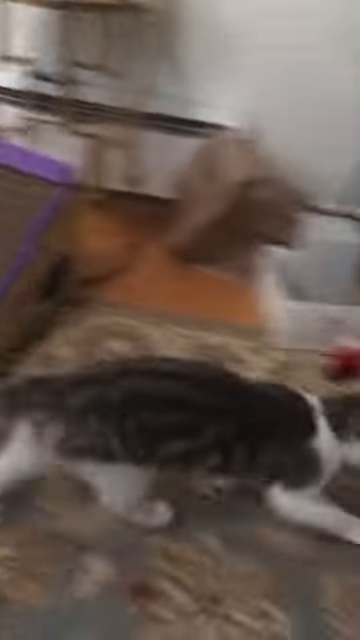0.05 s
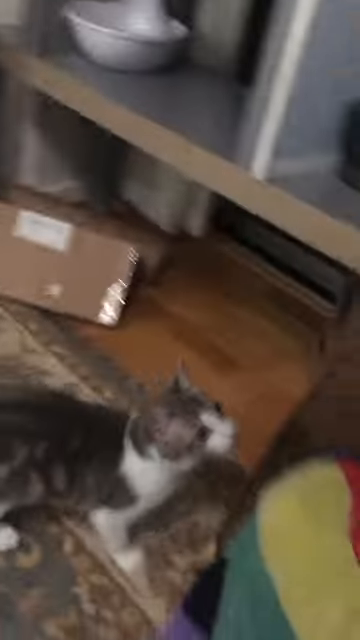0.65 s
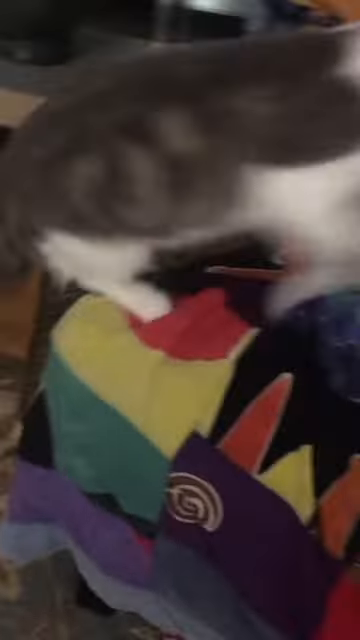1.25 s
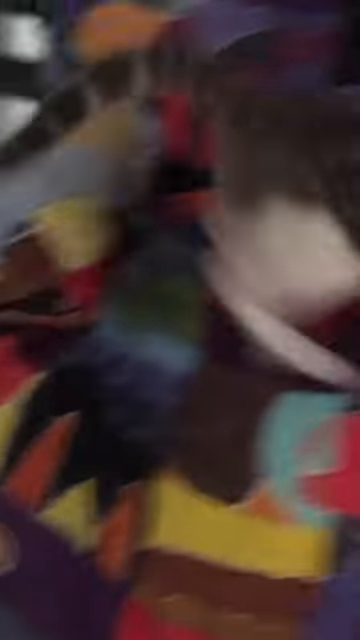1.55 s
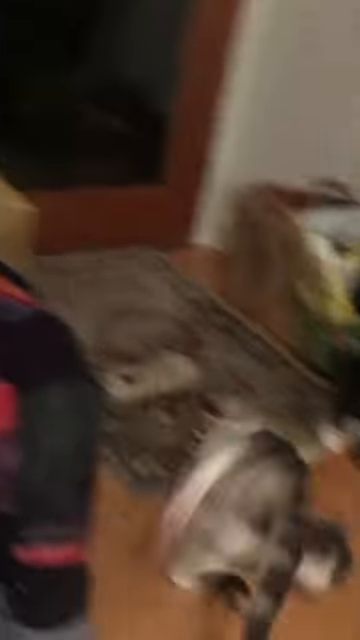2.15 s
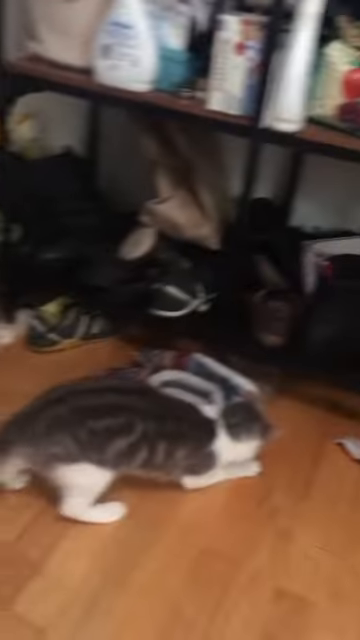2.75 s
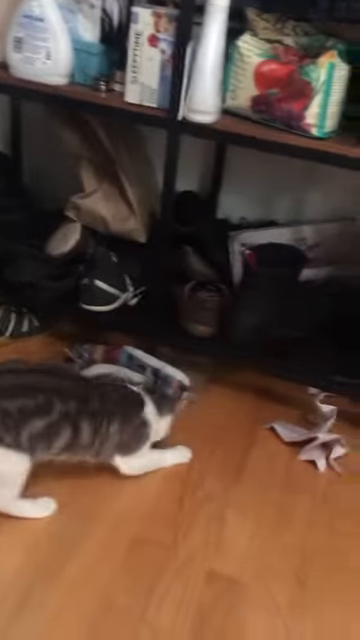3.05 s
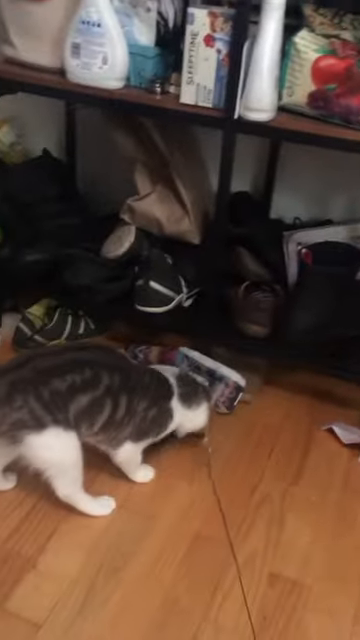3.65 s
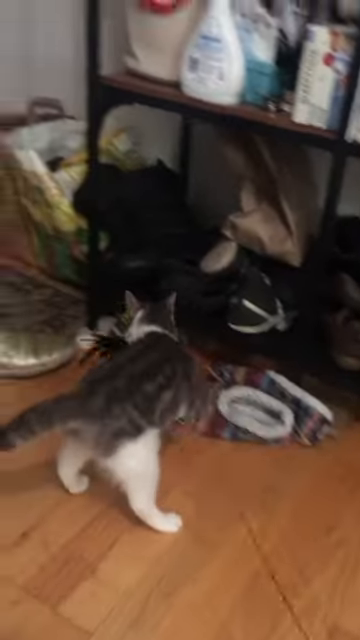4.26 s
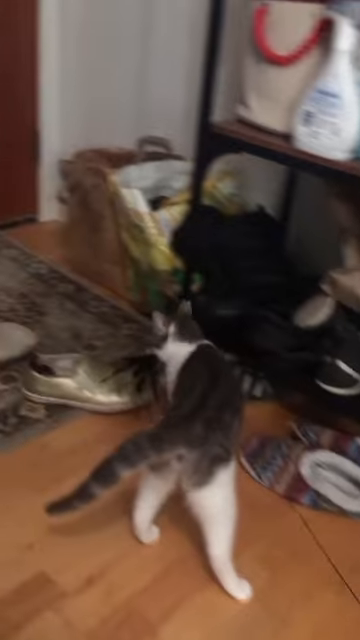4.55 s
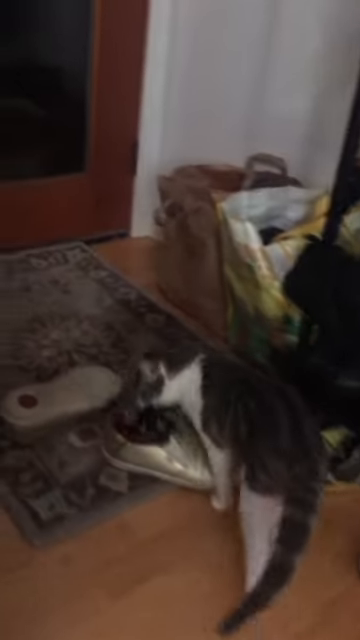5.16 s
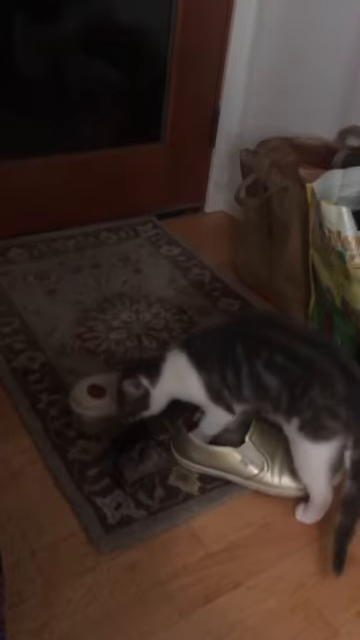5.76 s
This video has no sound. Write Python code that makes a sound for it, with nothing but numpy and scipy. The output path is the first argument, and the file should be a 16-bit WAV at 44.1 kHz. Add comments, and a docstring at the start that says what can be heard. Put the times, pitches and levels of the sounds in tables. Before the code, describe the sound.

A kitten moves about nearby in a small, quiet room with a faint low rumble of air. For the first second there are soft scuffs, fur rustling on a rug and a few tiny claw ticks. From about 1.1 seconds, low padded thuds quicken across a blanket, with very faint, thin claw squeaks around 1.6. At 1.8 a loud, sharp slap marks the leap, followed by bumps and a brief swish near 2 seconds. At 2.4 comes the loudest sound, a hard crack of landing that briefly rings the floorboards, with two quick knocks just after. Lighter taps follow at 2.7 and 3 seconds. Claws tick and scrabble softly from about 3.3 to 3.6. The rest is much quieter: faint rustling, a small knock near 4.9, and a few soft paw falls and rubs against a shoe until 6 seconds.

```python
"""A small, quiet room: a kitten trots over a rug, scrambles across a blanket, pounces onto the wooden
floor and noses at a shoe. Fur and cloth rustle over a bed of still air, with scuffs and thin squeaks.
Padded paws land as low, damped thuds, light things knock on the boards and claws tick brightly.
Two hard strikes stand out: the slap of the leap, then the crack of the landing, which rings the boards."""
import sys
import numpy as np
from scipy import signal
from scipy.fft import rfft, irfft
from scipy.io import wavfile

SR = 44100
rng = np.random.default_rng(int(sys.argv[2]) if len(sys.argv) > 2 else 0)


def unload_wav(signal):
    """Save mono or channel-first audio to the path in sys.argv[1] as 16-bit WAV at rate SR, clipped to [-1, 1]."""
    wavfile.write(
        sys.argv[1],
        SR,
        np.round(np.clip(np.atleast_2d(signal).T, -1, 1) * 32767).astype(np.int16),
    )


N = 265570
TIME = np.arange(N) / SR
SHORT = TIME[:SR // 2]  # half a second, the span of a one-shot


def amp(db):
    """Decibels to gain."""
    return 10 ** (np.asarray(db) / 20)


def unit(x):
    """Scales to an rms of one."""
    return x / np.sqrt(np.mean(x ** 2) + 1e-20)


def read(points, hz):
    """Reads a curve along a log-frequency axis."""
    freqs, values = np.transpose(points)
    return np.interp(np.log(hz + 1), np.log(freqs + 1), values)


def add(mix, s, sound):
    """Mixes a sound in at s seconds."""
    part = mix[max(round(s * SR), 0):][:len(sound)]
    part += sound[:len(part)]


def noise(spectrum):
    """Steady noise of unit rms with a given spectrum."""
    gain = amp(read(spectrum, np.fft.rfftfreq(N, 1 / SR)))
    return unit(irfft(rfft(rng.standard_normal(N)) * gain, N))


def wander(rate_hz):
    """Smooth random modulation of unit rms."""
    gain = np.exp(-(np.fft.rfftfreq(N, 1 / SR) / rate_hz) ** 2)
    return unit(irfft(rfft(rng.standard_normal(N)) * gain, N))


def band(x, hz, spread, order=1):
    """Band-pass from hz / spread to hz * spread, kept below Nyquist."""
    edges = np.minimum([hz / spread, hz * spread], [.4 * SR, .47 * SR])
    return signal.sosfilt(signal.butter(order, edges, "band", fs=SR, output="sos"), x)


def colour(x, spectrum, size=2048):
    """Minimum-phase EQ of unit energy, which keeps attacks sharp."""
    log_gain = np.log(amp(read(spectrum, abs(np.fft.fftfreq(size, 1 / SR)))))
    taps = np.fft.ifft(np.exp(np.conj(signal.hilbert(log_gain)))).real
    return signal.fftconvolve(x, taps / np.linalg.norm(taps))[:len(x)]


def room_air(level_db=-65.5):
    """Still air: a steady low rumble with a trace of hiss."""
    # room tone spectrum (frequency [Hz], relative level [dB])
    air_spectrum = [(15, -30), (30, -10.5), (70, -3), (125, -6), (190, -9.5), (300, -15), (600, -21.5),
                    (1400, -30), (3000, -32), (5000, -35.5), (9000, -32), (10400, -35.5), (13000, -26),
                    (16000, -28.5)]
    return amp(level_db) * noise(air_spectrum)


def room_tail(build_s=0.0013):
    """Diffuse reverb of a small room, of unit energy; the highs die first."""
    # reverb decay (frequency [Hz], t60 [s])
    decay_times = [(80, 0.42), (300, 0.31), (1000, 0.28), (2500, 0.25), (6000, 0.19), (15000, 0.076)]
    hz, t, bins = signal.stft(rng.standard_normal(len(SHORT)), SR, nperseg=256)
    decay = amp(-60 * t / read(decay_times, hz)[:, None])
    tail = signal.istft(bins * decay, SR, nperseg=256)[1][:len(SHORT)]
    tail *= 1 - np.exp(-SHORT / build_s)
    return tail / np.linalg.norm(tail)


def rustle(rub_db=-63, swish_db=-65, fizz_db=-64.5, easy_pace_db=-66, uneven_db=1.5, snags_per_s=500):
    """Uneven pressure drives a low rub, a swish of fur and the fizz of single fibres letting go."""
    # how briskly fur rubs on rug and cloth (time [s], drive [dB])
    pace = [(0, -58), (.16, -68.5), (.3, -65.5), (.66, -62.5), (.78, -68), (1.07, -69.5), (1.26, -61.5),
            (1.54, -63.5), (1.72, -70), (2.1, -66), (2.32, -71), (2.64, -59), (2.79, -78), (3.97, -80),
            (4.2, -72.5), (4.56, -75.5), (4.84, -70), (5.03, -73.5), (5.85, -72), (6.02, -79.5)]
    # the body brushing past things (centre time [s], time to fade by 9 dB [s], peak drive [dB])
    brushes = [(0.039, -0.01, -55.5), (1.53, 0.05, -65.5), (2.06, 0.0728, -51), (3.315, .04, -60),
               (3.47, 0.08, -64.5), (3.571, 0.0271, -60), (5.422, 0.03, -59), (5.802, 0.15, -65.5)]
    # spectra of the three friction layers (frequency [Hz], relative level [dB])
    rub_spectrum = [(25, -16.5), (70, 6), (130, -1.5), (300, -2), (450, -11), (800, -16.5), (2000, -45.5)]
    swish_spectrum = [(200, -18), (600, -1.5), (1400, 0.5), (2600, -0.5), (4500, -7.5), (8000, -21.5),
                      (16000, -35.5)]
    fizz_spectrum = [(1500, -18), (4500, -7.5), (6200, 2), (7600, -5.5), (9300, 1.5), (10400, -4.5),
                     (12000, 2), (15500, 0)]
    brushing = sum(amp(db) * np.exp(-((TIME - s) / fade) ** 2) for s, fade, db in brushes)
    motion = np.hypot(amp(np.interp(TIME, *np.transpose(pace))), brushing)
    pressure = motion * amp(uneven_db * wander(rate_hz=25) - easy_pace_db)  # about 1 at an easy pace
    snags = (rng.random(N) < snags_per_s / SR) * rng.choice([-1, 1], N)
    snags = snags * amp(9 * np.minimum(rng.exponential(1, N), 4))  # a few catch much harder
    fibres = unit(noise(fizz_spectrum) + 0.24 * unit(colour(snags, fizz_spectrum)))
    rub = amp(rub_db) * pressure ** 0.92 * noise(rub_spectrum)
    swish = amp(swish_db) * pressure * noise(swish_spectrum)
    fizz = amp(fizz_db) * pressure ** 0.8 * fibres
    return rub + swish + fizz


def slides(strokes, spread):
    """Each slide swells and fades as a band of friction noise."""
    out = np.zeros(N)
    for s, length, db, hz in strokes:
        swell = signal.windows.hann(min(int(length * SR), len(SHORT)))
        friction = unit(band(rng.standard_normal(len(SHORT)), hz, spread, order=2))
        add(out, s - length / 2, amp(db) * swell * friction[:len(swell)])
    return out


def scuffs():
    """A paw slips or cloth snags and slides in a short, broad puff of friction."""
    # paw slips and snags of cloth (centre time [s], length [s], rms at the crest [dB], band centre [Hz])
    slips = [(.01, 0.047, -52, 1960), (.62, .25, -64.5, 1870), (.68, 0.065, -54.5, 1630),
             (.86, 0.2, -59.5, 13600), (1.215, 0.022, -50.5, 14100), (1.9, 0.14, -59, 7550),
             (2.058, 0.06, -46, 15200), (2.068, .07, -52.5, 2210), (2.238, 0.1, -51.5, 14500),
             (3.279, .04, -55, 739), (3.307, .12, -59.5, 3520), (4.364, .073, -63.5, 1693),
             (5.522, 0.062, -63, 845), (5.75, 0.45, -62.5, 381.5)]
    return slides(slips, spread=1.46)


def squeaks():
    """Claws drag through the blanket in a thin, narrow whistle."""
    # claw drags (centre time [s], length [s], rms at the crest [dB], pitch [Hz])
    drags = [(1.543, .015, -59, 14100), (1.58, 0.041, -56, 12700), (1.614, .03, -56, 14250),
             (1.694, .035, -62, 14500)]
    return slides(drags, spread=1.05)


def thud(db, hz, t60, rise_cycles=0.36, shudder_db=-14, shudder_cycles=30):
    """A padded blow swells within a cycle, then cushion or floor rings down with an uneven shudder."""
    swell = 1 - np.exp(-(SHORT * hz / rise_cycles) ** 2)
    envelope = swell * amp(-60 * SHORT / t60)
    tone = envelope / envelope.max() * np.sin(2 * np.pi * hz * SHORT)
    shudder = unit(band(rng.standard_normal(len(SHORT)), 0.98 * hz, spread=1.5, order=4))
    shudder *= swell * amp(-60 * SHORT * hz / shudder_cycles)
    return amp(db) * (tone + amp(shudder_db) * shudder)


def paws(wet_db=-16):
    """Paws fall on rug, blanket and boards, and their thuds spread into the room."""
    # paw falls (time [s], peak level [dB], pitch of the surface [Hz], t60 [s])
    footfalls = [(.119, -42, 170, .066), (0.142, -39, 190, .03), (0.828, -46, 110, .15),
                 (.85, -48, 134, .09), (0.913, -49, 116, .035), (1.107, -37, 99, .035),
                 (1.189, -34, 101, .045), (1.244, -39.5, 108, .09), (1.374, -33.5, 127.5, .13),
                 (1.378, -45, 270, 0.065), (1.424, -45, 170, .08), (1.586, -42, 80, .08),
                 (1.632, -35.5, 135, .075), (1.648, -39.5, 89, .11), (1.775, -18.5, 435, .03),
                 (1.779, -28.5, 590, .07), (1.829, -32, 102, .13), (1.868, -37, 71, .07),
                 (1.988, -31.5, 475, .04), (1.995, -19.5, 270, .012), (2.022, -24, 210, .036),
                 (2.152, -42, 242, .033), (2.187, -43.5, 547, .045), (2.216, -20.5, 323, .025),
                 (2.233, -35, 400, .1), (2.268, -29, 291, .11), (2.35, -37, 315, .06),
                 (2.429, -23.5, 287, .085), (2.517, -47, 128, .06), (2.548, -38, 290, .07),
                 (3.564, -43.5, 165, .04), (4.253, -53, 190, .03), (4.401, -51, 130, .05),
                 (5.309, -43, 331, .03), (5.552, -47.5, 392, .037), (5.701, -45.5, 374, .032),
                 (5.929, -46.5, 232, .07)]
    out = np.zeros(N)
    for s, db, hz, t60 in footfalls:
        add(out, s, thud(db, hz, t60))
    return out + amp(wet_db) * signal.fftconvolve(out, room_tail())[:N]


def contact(t60, scatter_db, wet_db, echo_db=-12, echoes=4):
    """One sharp contact, the scatter that dies behind it, a few near reflections and the room."""
    hit = rng.standard_normal(len(SHORT)) * amp(-60 * SHORT / t60)
    hit *= amp(scatter_db) / np.linalg.norm(hit)
    hit[0] = 1  # the click itself
    delays = (rng.uniform(.0005, .006, echoes) * SR).astype(int)
    hit[delays] += amp(echo_db) * rng.choice([-1, 1], echoes)
    return hit / np.linalg.norm(hit) + amp(wet_db) * room_tail()


def boards():
    """The short ring of the wooden floor, of unit energy."""
    # modes of the boards and what lies on them (frequency [Hz], relative level [dB], t60 [s])
    modes = [(596, -8.5, 0.28), (1416, -7.5, 0.21), (1470, -10.5, 0.29), (1790, -10.5, .25),
             (2315, -4, .22), (2494, -6.5, 0.14), (2640, -6.5, .27), (2773, -8, .3), (2974, -8, .21),
             (3430, -6.5, .3), (3130, -3, .2), (3660, -8.5, .2), (3900, -6.5, 0.15), (3850, -1.5, 0.22),
             (5300, -10.5, .12)]
    ring = sum(amp(db - 60 * SHORT / t60) * np.sin(2 * np.pi * (hz * SHORT + rng.random()))
               for hz, db, t60 in modes)
    return ring / np.linalg.norm(ring)


def knocks(gain_db=13, boards_db=-6, boom_db_per_octave=-6):
    """Taps ring briefly in one resonance; on bare wood they are broader and wake boards, floor and room."""
    # light knocks (time [s], relative level [dB], band centre [Hz], surface [0 padded to 1 bare wood])
    taps = [(1.107, -43.5, 657, 0.16), (1.227, -40.5, 3260, .2), (1.371, -39, 890, 0.5),
            (1.632, -40, 298, 0.12), (1.9888, -33, 700, 0.85), (2.0196, -21.5, 1850, 0.2),
            (2.1615, -38, 2600, .3), (2.348, -37, 1050, 0.15), (2.403, -41.5, 726, .1),
            (2.5141, -18.5, 2970, 0.98), (2.5346, -18, 2900, 0.75), (2.6594, -31, 1280, 1),
            (2.9555, -30, 1000, 0.84), (2.9769, -33.5, 1090, 0.92), (3.64, -49, 1200, 0.82),
            (4.1, -47, 1686, 0.25), (4.252, -47, 680, 0.24), (4.9377, -37.5, 1000, 0.05),
            (5.306, -48, 550, 0.22), (5.552, -48, 1018, 0.2)]
    out = np.zeros(N)
    for s, db, hz, wood in taps:
        spread = np.interp(wood, [0, 1], [1.25, 2.7])
        wet_db = np.interp(wood, [0, 1], [-12, -4.5])
        boom_db = np.interp(wood, [0, 1], [-23, -11.5])
        boom_db += boom_db_per_octave * np.log2(hz / 1000)  # brighter knocks are lighter
        tap = band(contact(t60=.045, scatter_db=5, wet_db=wet_db), hz, spread, order=2)
        ring = amp(wet_db + boards_db) * band(boards(), hz, spread)
        add(out, s, amp(db + gain_db) * (tap / np.linalg.norm(tap) + ring))
        add(out, s, thud(db + boom_db, hz=290, t60=.06))  # the floor's low boom
    return out


def claws(gain_db=5, ticks_per_s=70, spread_db=8):
    """Tiny bright snaps, each with a few milliseconds of scatter; scrabbling strews weaker ones."""
    # the clearest ticks (time [s], relative level [dB])
    accents = [(.0728, -26), (.2348, -31), (.713, -28.5), (.756, -32), (1.1394, -36), (1.2206, -23),
               (1.7704, 0), (1.7735, 2), (1.7761, .5), (1.8071, -2), (2.0197, -21), (2.0235, -19),
               (2.2258, -26.5), (2.3316, -36), (2.3429, -30), (2.431, 2), (2.498, -16), (2.5126, -1.5),
               (2.5268, -7), (2.534, -6.5), (2.6597, -25.5), (2.715, -32.5), (2.9505, -26), (3.256, -38),
               (3.3305, -30), (3.4047, -24.5), (3.413, -32.5), (3.5197, -27), (3.5477, -27), (3.5677, -29),
               (3.5815, -30), (3.978, -42)]
    # spells of scrabbling (start [s], length [s], relative level [dB])
    scrabbles = [(2.664, 0.057, -41.5), (3.294, .15, -42), (3.48, 0.16, -36.5)]
    # spectrum of a tick (frequency [Hz], relative level [dB])
    tick_spectrum = [(500, -26.5), (3000, -14), (6000, -4.5), (9600, 1), (10500, -5.5), (12000, 1.5),
                     (15500, -1)]
    ticks = list(accents)
    for start, length, db in scrabbles:
        draws = rng.random((40, 2))[:round(length * ticks_per_s)]
        ticks += [(start + length * when, db + spread_db * (2 * size - 1)) for when, size in draws]
    out = np.zeros(N)
    for s, db in ticks:
        tick = contact(t60=.011, scatter_db=1, wet_db=-9.5)
        add(out, s, amp(db + gain_db) * tick / np.linalg.norm(tick))
    return colour(out, tick_spectrum)


def strikes(boards_db=-11):
    """A slap at the leap, then a hard crack at the landing that sets the boards ringing."""
    # each strike is a quick cluster of contacts (time [s], level [dB], kind [0 leap, 1 landing])
    hits = [(1.7749, 1.5, 0), (1.776, 5.5, 0), (1.7793, -2, 0), (1.7878, -5, 0), (2.4286, 8.5, 1),
            (2.4304, 3, 1), (2.4318, 5, 1)]
    # spectra of the slap and the crack (frequency [Hz], relative level [dB])
    leap_spectrum = [(100, -14.5), (300, -9), (450, -3.5), (620, -5), (850, -13), (1200, -7.5), (1800, -5),
                     (2400, -6), (3200, -18.5), (4300, -15.5), (5700, -6.5), (7500, -21), (9900, -6),
                     (15500, -11.5)]
    landing_spectrum = [(100, -21.5), (250, -6.5), (420, -4), (520, -10), (650, -5), (800, -9), (1400, -6),
                        (2300, -2), (2800, -6), (3700, 0), (5200, -7.5), (7000, -10), (10000, -14.5),
                        (15500, -15)]
    out = np.zeros(N)
    for s, db, lands in hits:
        if lands:
            crack = colour(contact(t60=.025, scatter_db=1.5, wet_db=-7.5), landing_spectrum)
            blow = crack + amp(boards_db) * boards()
        else:
            blow = colour(contact(t60=.071, scatter_db=3, wet_db=-4), leap_spectrum)
        add(out, s, amp(db) * blow)
    return out


def scene():
    """The kitten's impacts and friction over the room tone, in mono."""
    mix = paws() + scuffs() + squeaks() + rustle() + strikes() + knocks() + room_air() + claws()
    return mix[None]


def record(dry, cutoff_hz=15900):
    """A steep low-pass trims the very top."""
    lowpass = signal.firwin(301, cutoff_hz, window=("kaiser", 8), fs=SR)
    return signal.oaconvolve(dry, lowpass[None], "same")


dry = scene()
out = record(dry)
unload_wav(out)
```